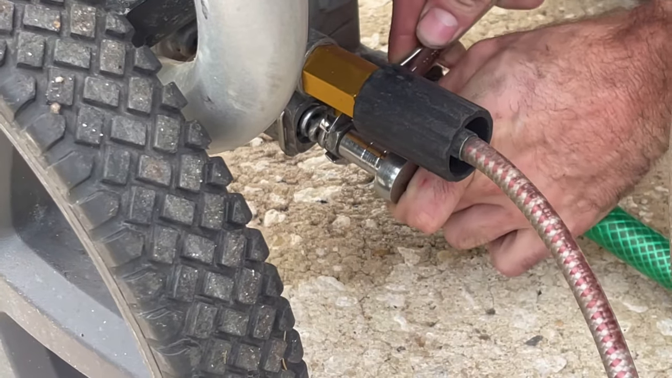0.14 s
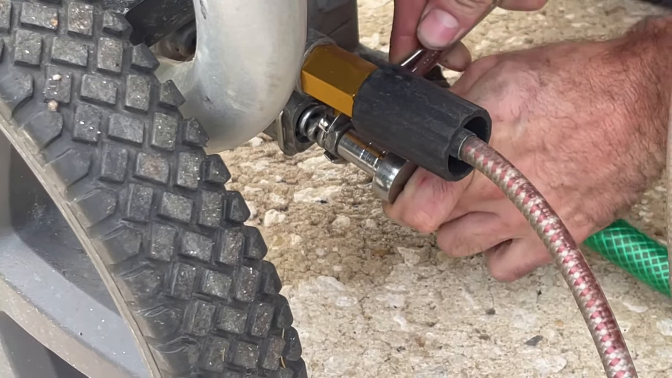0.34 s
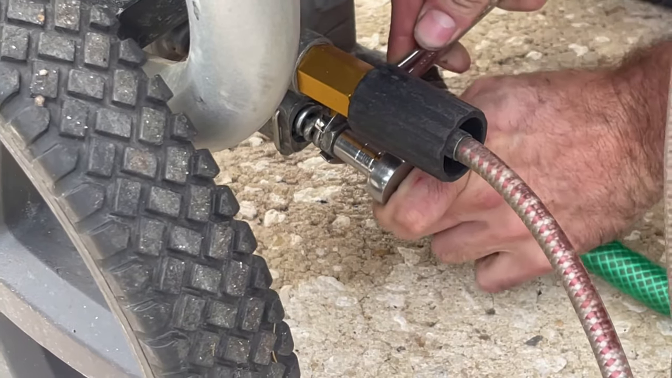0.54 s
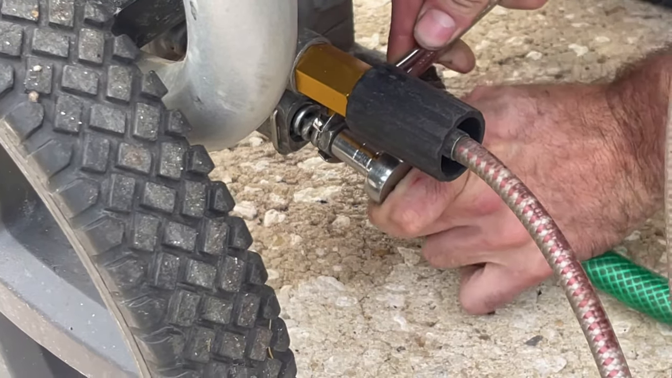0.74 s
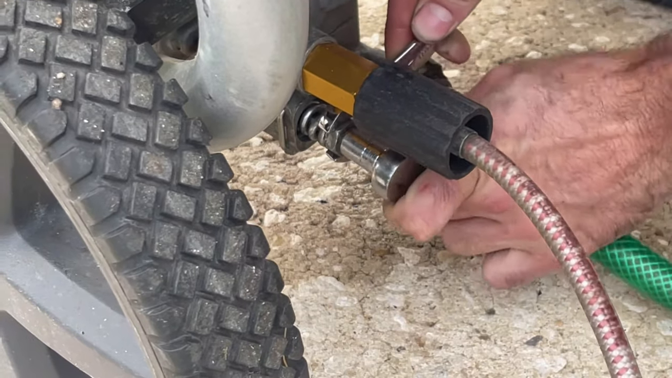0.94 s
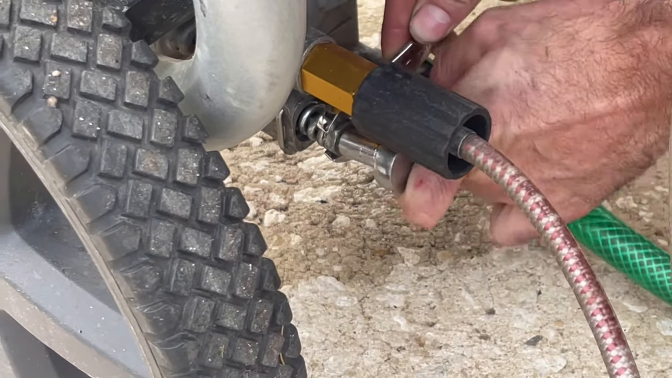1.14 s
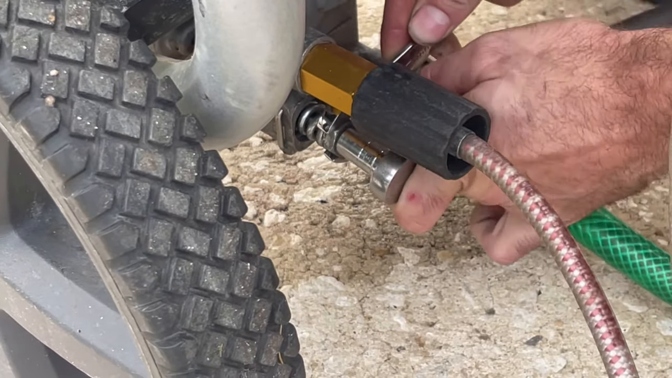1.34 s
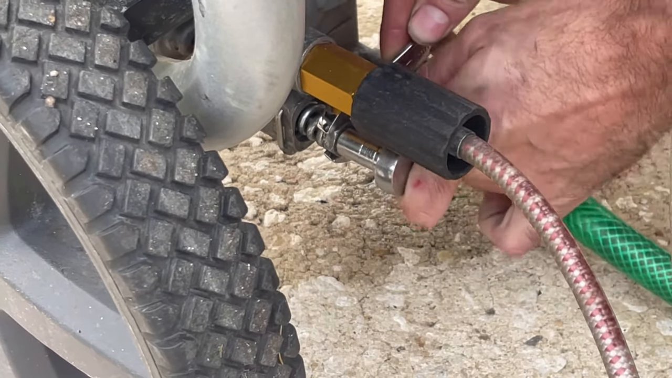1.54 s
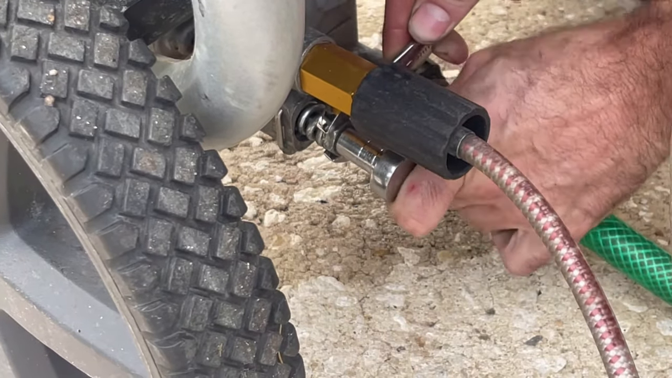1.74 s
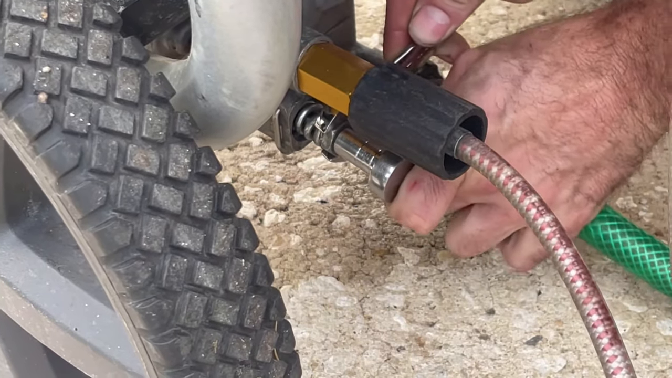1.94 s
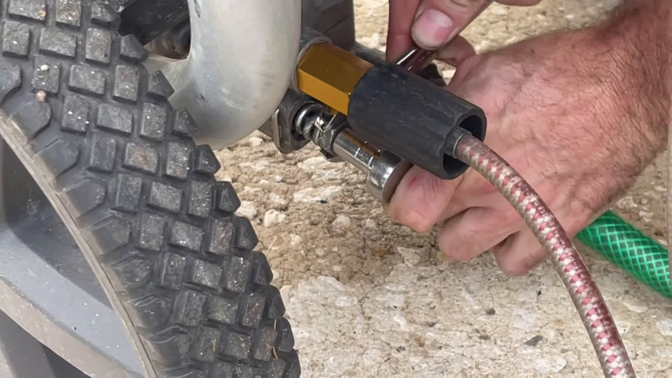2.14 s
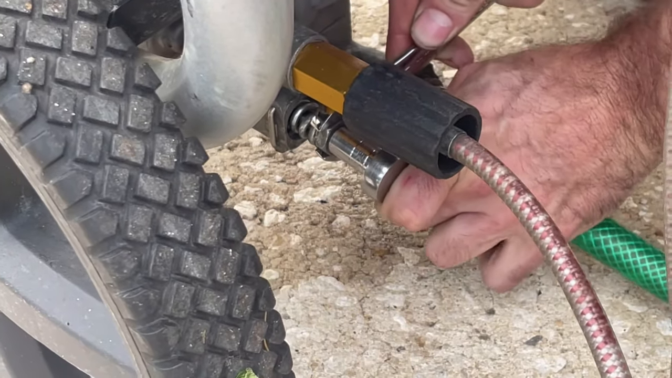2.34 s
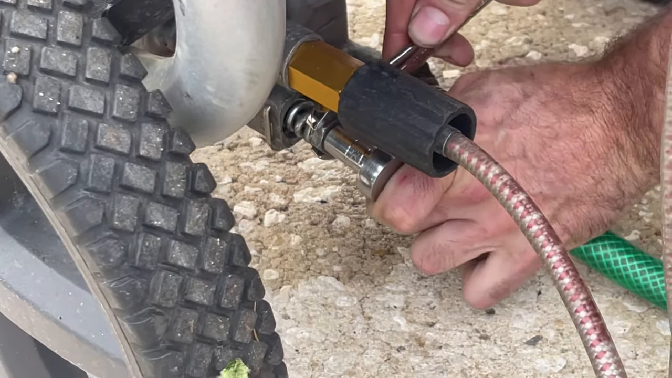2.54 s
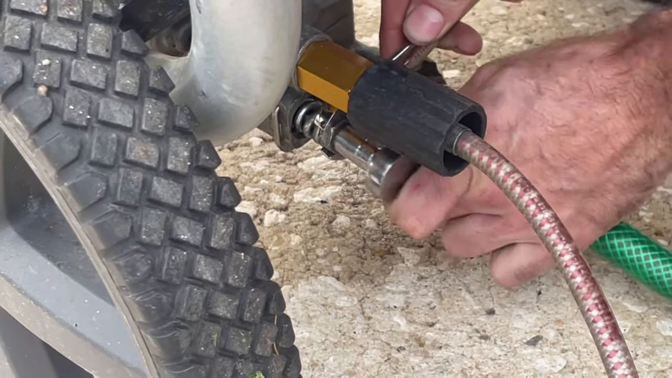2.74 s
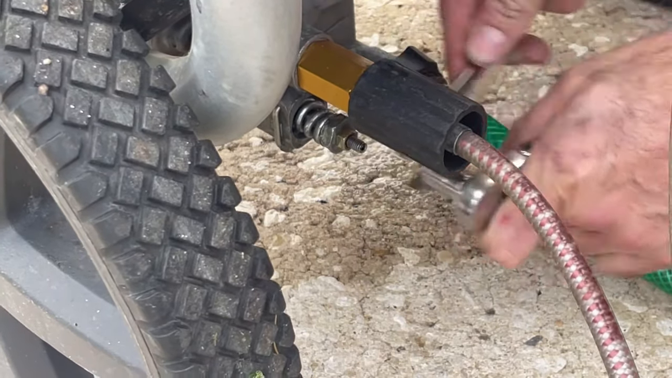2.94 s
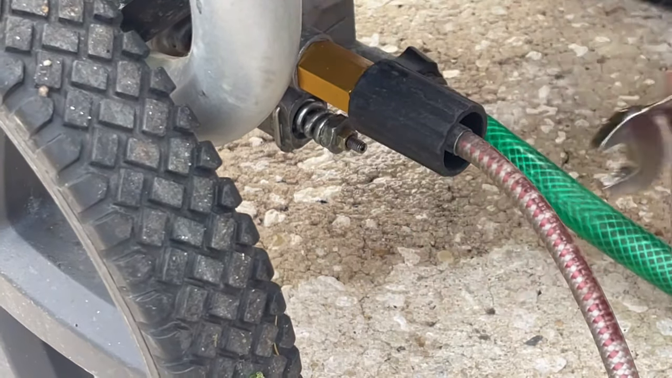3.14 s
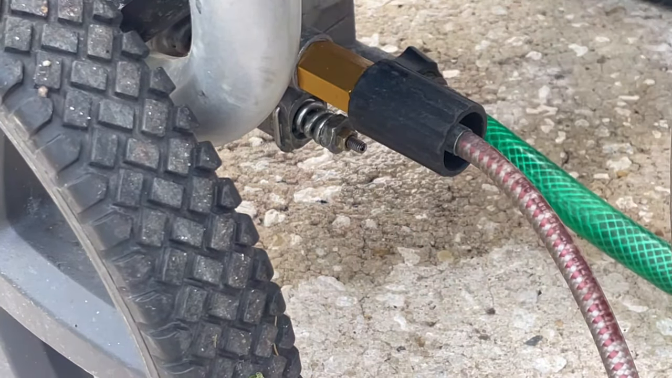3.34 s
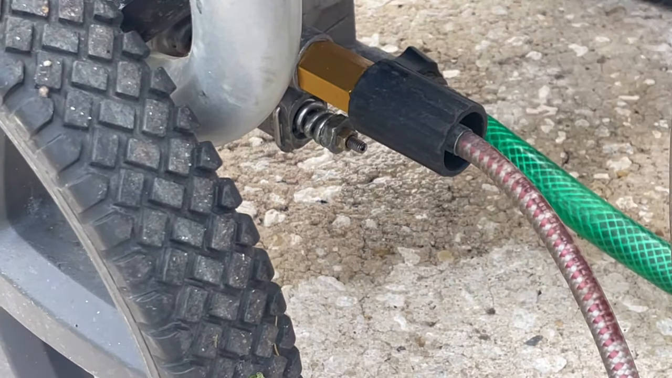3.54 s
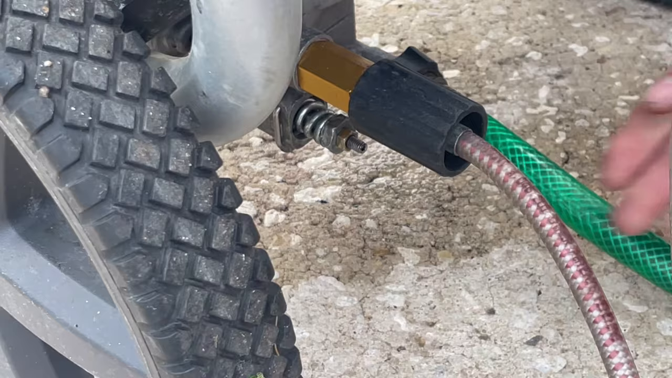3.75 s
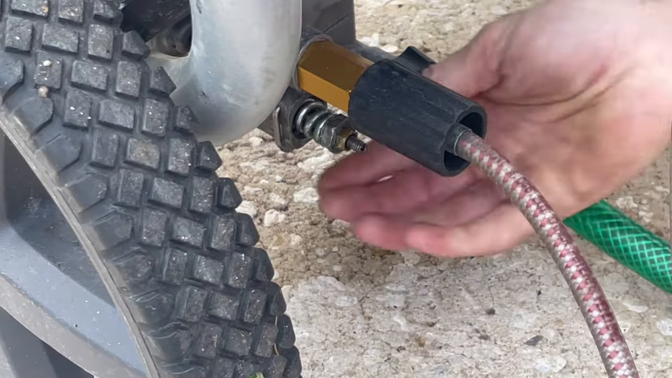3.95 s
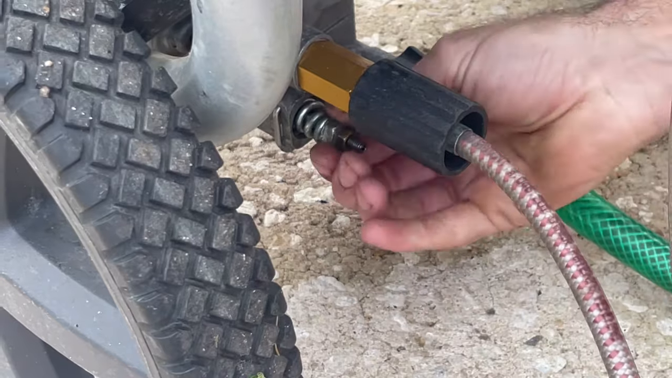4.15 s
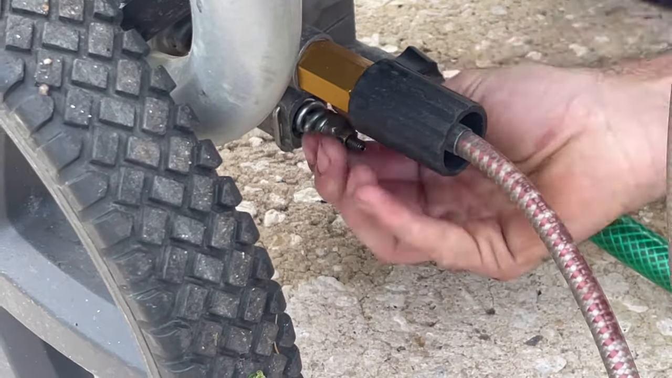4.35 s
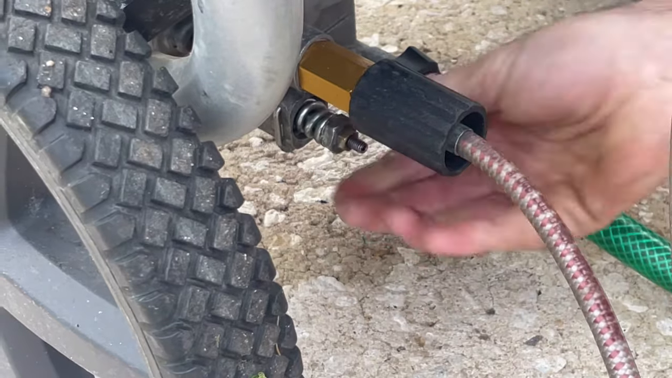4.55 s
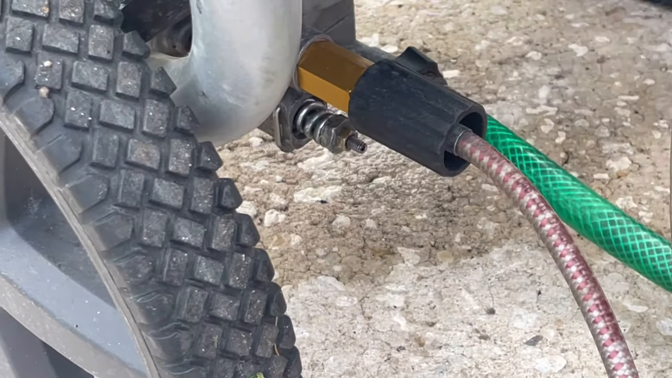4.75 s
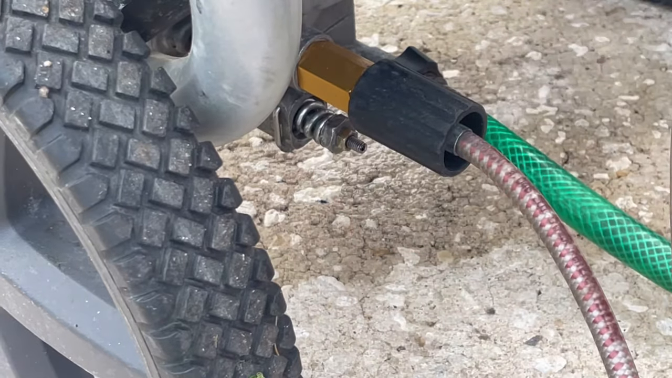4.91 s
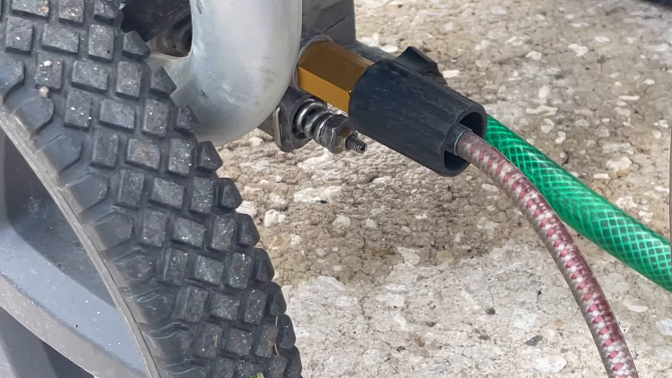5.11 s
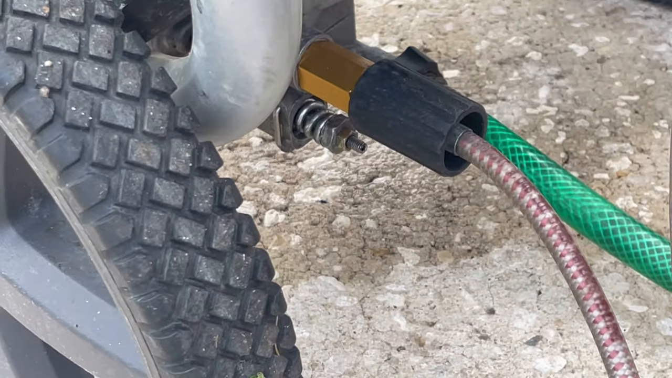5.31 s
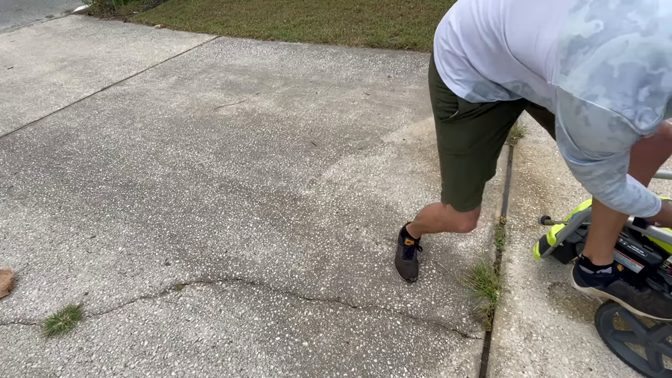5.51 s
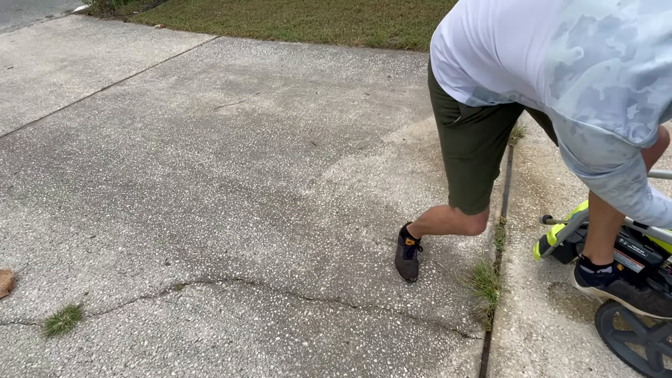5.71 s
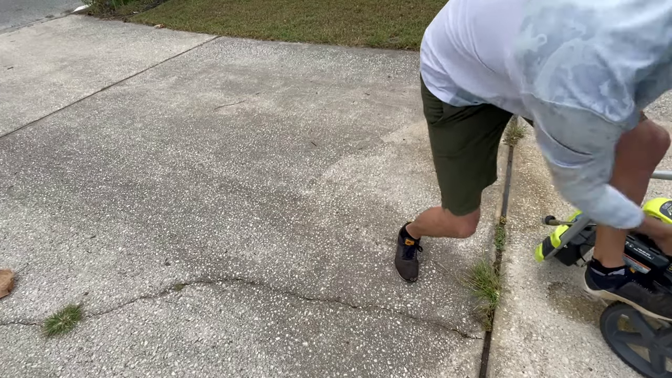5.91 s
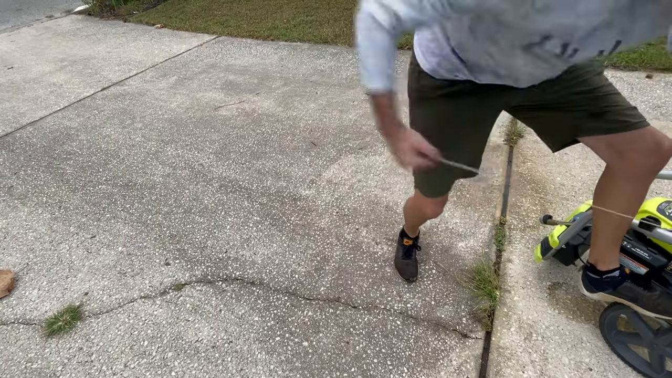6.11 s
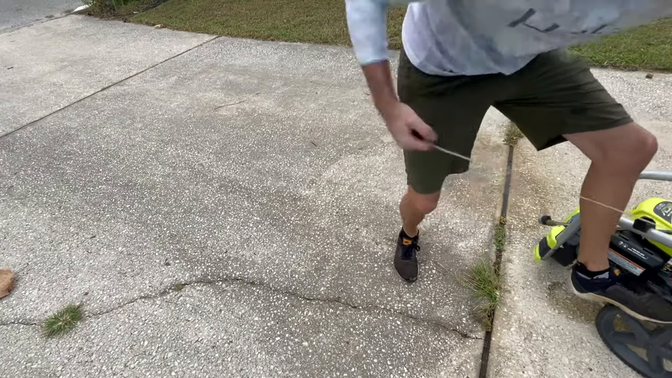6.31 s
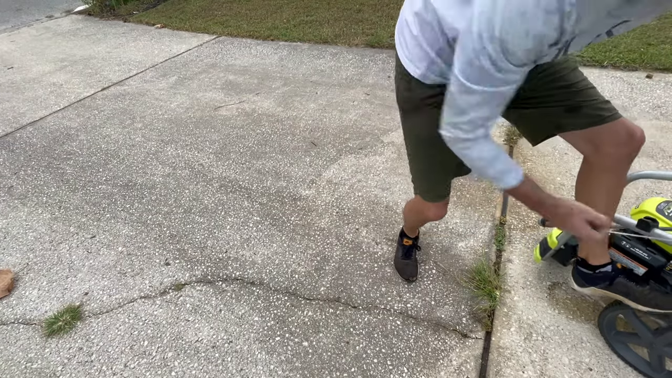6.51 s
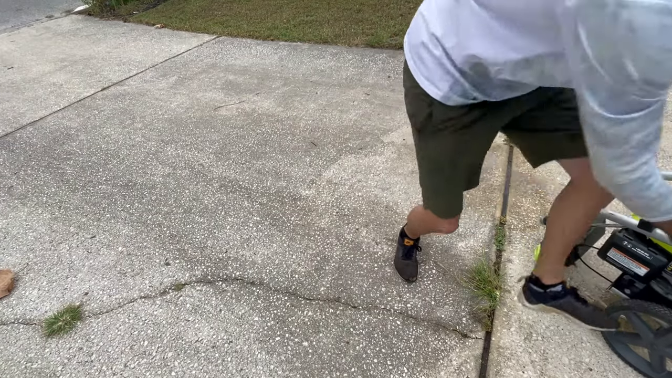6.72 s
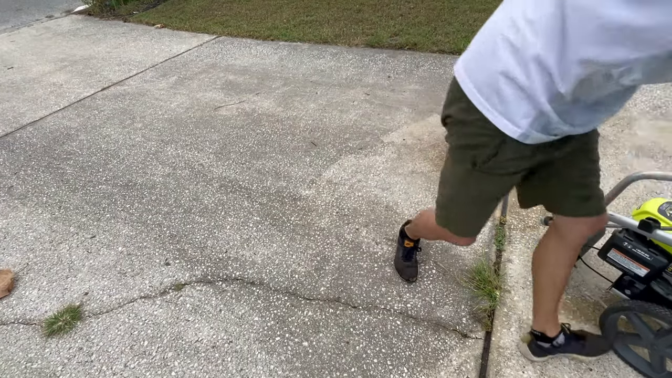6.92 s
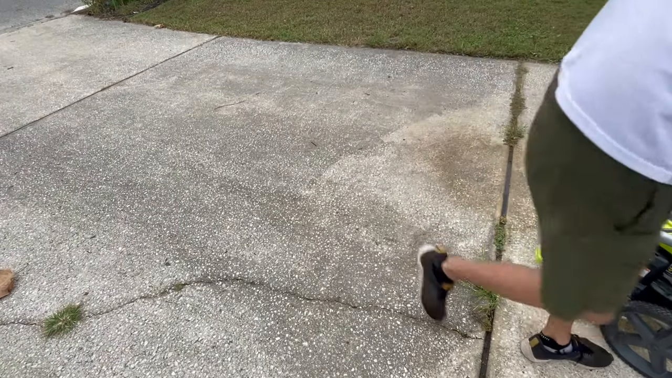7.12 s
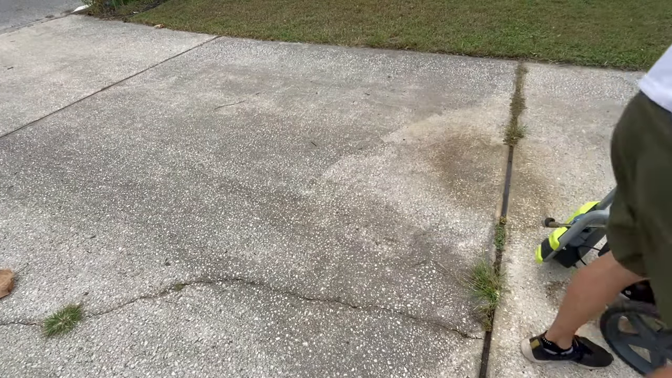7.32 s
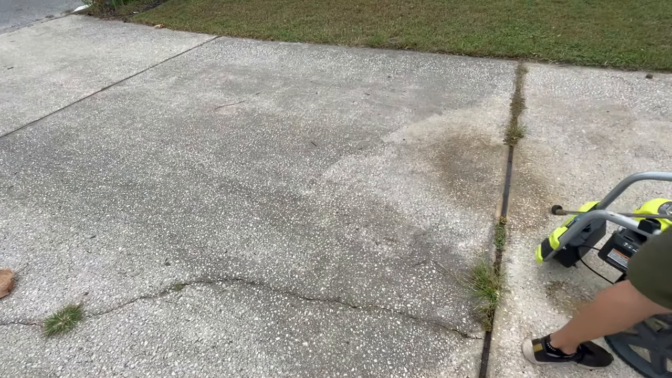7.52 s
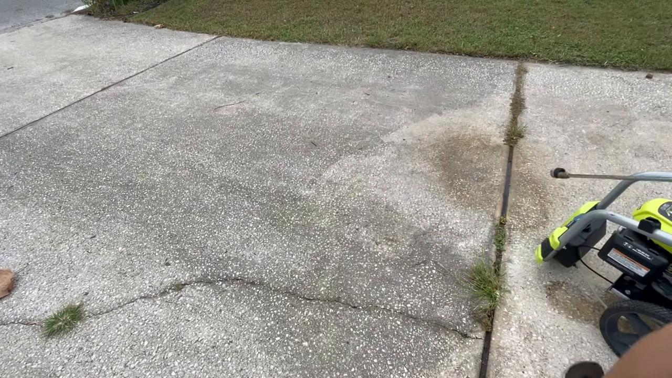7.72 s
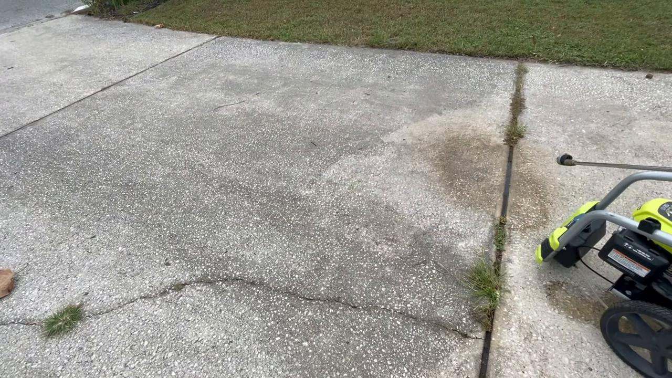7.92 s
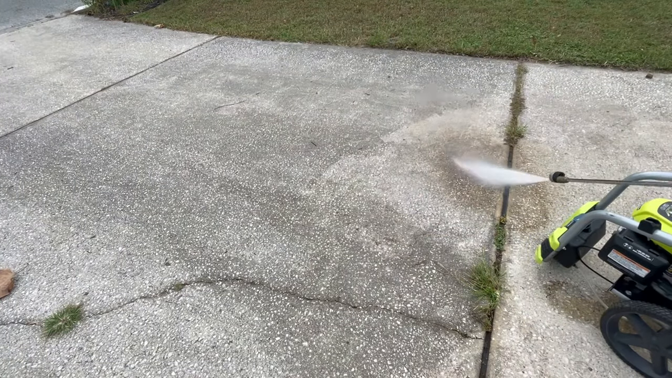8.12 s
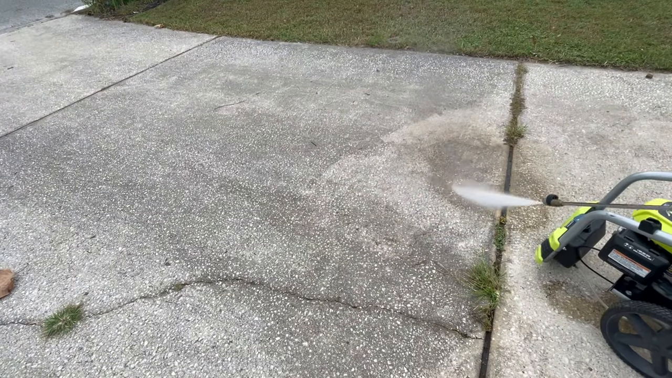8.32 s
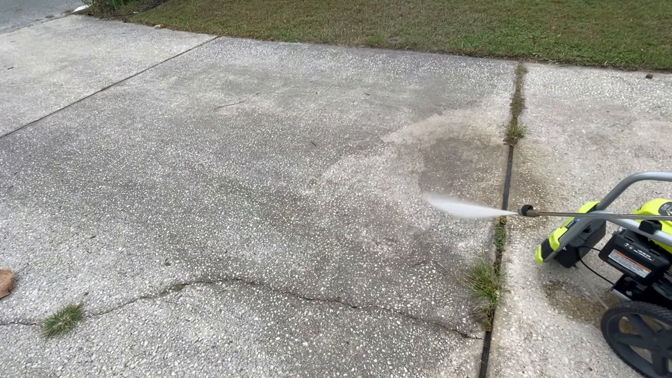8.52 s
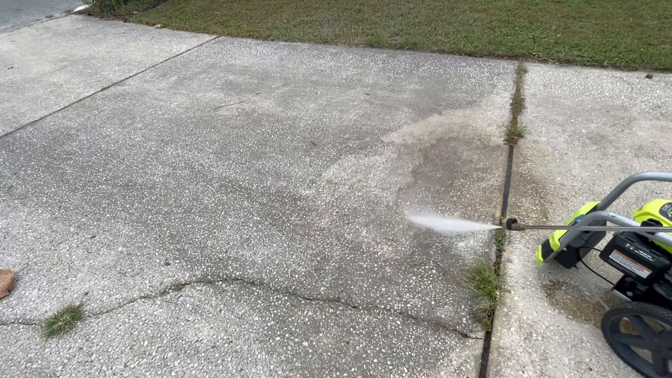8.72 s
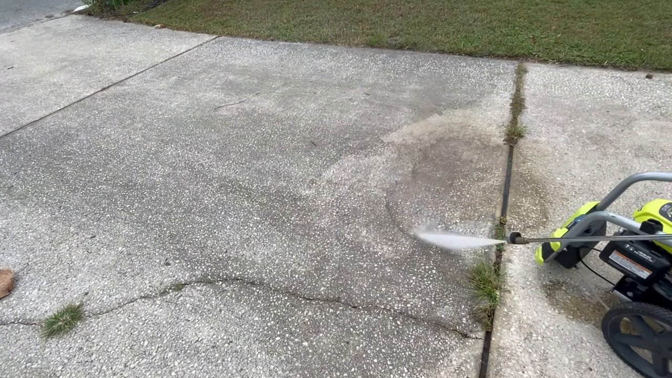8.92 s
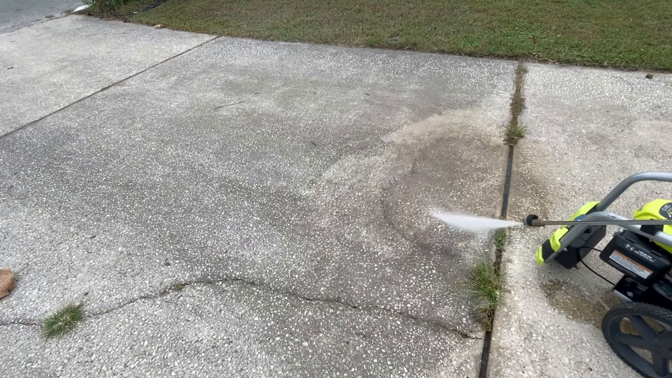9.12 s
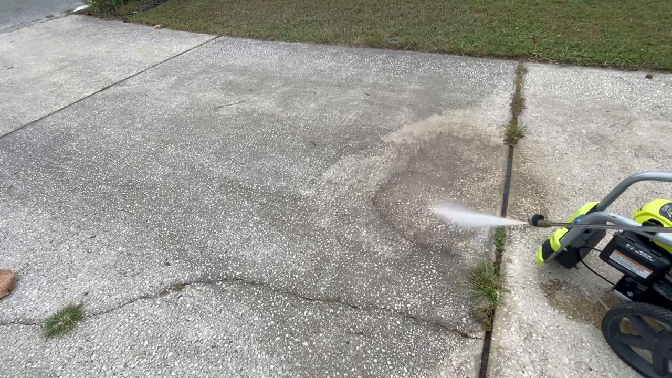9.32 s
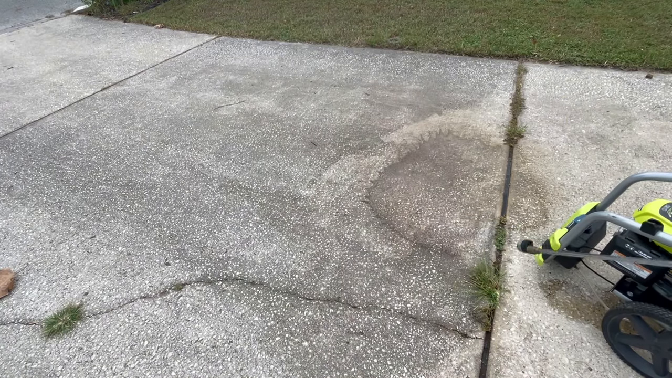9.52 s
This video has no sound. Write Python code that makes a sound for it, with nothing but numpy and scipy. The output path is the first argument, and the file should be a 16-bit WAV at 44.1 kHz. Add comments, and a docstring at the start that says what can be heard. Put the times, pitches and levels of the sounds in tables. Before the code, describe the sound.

Close up, a steel valve on a pressure washer is worked loose with sparse dry clicks, then bright clinks of its spring and nut, over a faint distant hum. The sound cuts to a wide outdoor driveway. A starter cord rasps, and the small petrol engine catches, runs loudly and sags towards idle. A trigger clicks, water hisses on concrete and the engine picks up again.

```python
"""At a pressure washer's pump, close up: a steel valve is worked loose with dry clicks, then bright
clinks of its spring and nut. Cut to the driveway, the machine spread wide in stereo: the starter
cord is pulled, the one-cylinder four-stroke catches and sags towards idle, then the trigger opens,
the jet hisses on the concrete and the engine picks up under load.
A far motor hums in the background."""
import sys
import numpy as np
from scipy import signal
from scipy.fft import rfft, irfft
from scipy.io import wavfile

SR = 44100
rng = np.random.default_rng(int(sys.argv[2]) if len(sys.argv) > 2 else 0)


def wav_out(sig):
    """Save sig, one row per channel (or a flat mono array), as 16-bit PCM at SR to the path in sys.argv[1]."""
    wavfile.write(sys.argv[1], SR, np.round(np.clip(np.atleast_2d(sig).T, -1, 1) * 32767).astype(np.int16))


N = 421596
TIME = np.arange(N) / SR
CUT_S, FIRST_STROKE_S = 5.36, 6.119

# Loose steel parts touch. Each row: start in seconds, level in dB, tilt in dB per octave, extra dB for
# the two modes near 4.5 kHz, seconds the fingers take to still a mode whose ring-time factor is 1.
STEEL_TOUCHES = [(3.319, -47.5, -2, -6, 0.059), (3.3399, -26.5, -6.5, -26, 0.22),
                 (3.382, -14, 16, -4, 0.15), (3.393, -21.5, 2.5, 12, 0.071), (3.492, -44.5, 12, -1, 0.048),
                 (3.6034, -24.5, 10, -24, 0.038), (3.625, -29.5, 7, -17, 0.063),
                 (3.7982, -30, 2.5, 12.5, 0.08), (3.9076, -43.5, -4.5, -7, 0.049),
                 (3.94, -48, -9.5, 1, 0.032), (4.395, -49, -3.5, -8, 0.087), (4.7582, -54, -3, 9, 0.18),
                 (4.814, -30, 5, 0.5, 0.07), (4.95, -41, 15, 13.5, 0.065), (5.077, -53.5, 2, -4, 1),
                 (5.1241, -29, -6.5, -0.5, 0.8), (5.2109, -13, 16.5, -8, 1)]
# Dry knocks of tool, fittings, shoes, starter and trigger. Each row: start in seconds, level in dB,
# brightness in dB (edge up, body down).
DRY_KNOCKS = [(0.109, -53.5, 0), (0.293, -65, -2), (0.56, -72, 5), (0.599, -76, 9), (0.658, -69, 3),
              (0.75, -63.5, 1), (0.899, -75, 11), (1.027, -36.5, -1), (1.093, -58, -18),
              (1.204, -62.5, 11.5), (1.227, -60.5, 7), (1.267, -59, 0), (1.561, -69, 3), (2.36, -72, 10),
              (2.675, -71.5, 11), (2.837, -41, 1), (2.884, -66.5, -22), (2.972, -56, -8), (2.988, -67, -1),
              (2.998, -48, 0), (3.339, -44, 4), (3.405, -40.5, 14.5), (3.56, -48.5, 11.5), (3.6, -36, 9.5),
              (4.217, -47.5, -0.5), (4.566, -43, 0.5), (4.677, -39.5, -1), (4.8147, -59, 8),
              (5.123, -42.5, -7.5), (5.153, -39.5, -5), (5.166, -36.5, 9.5), (5.236, -49, 12.5),
              (5.315, -49.5, 3.5), (5.398, -38.5, -3.5), (5.42, -41, -3), (5.468, -41.5, -19),
              (5.514, -34, -6.5), (5.591, -40.5, -3), (5.627, -48, -4), (5.808, -44, -1),
              (5.981, -18.5, -1.5), (6.01, -27, -5.5), (6.114, -41.5, 11.5), (6.2, -39, 7),
              (6.217, -27, 6.5), (6.222, -24.5, -3), (6.314, -25, -2.5), (8.109, -20, -1)]


def from_db(db):
    """Decibels to gain."""
    return 10 ** (np.asarray(db) / 20)


def unit_rms(x):
    """Scale to an rms of 1."""
    return x / np.sqrt(np.mean(x ** 2) + 1e-20)


def in_time(rows):
    """Each column of a curve over seconds, at every sample."""
    s, *columns = np.transpose(rows)
    return [np.interp(TIME, s, column) for column in columns]


def at_hz(points, hz):
    """Read a spectrum on a log-frequency axis."""
    point_hz, value = np.transpose(points)
    return np.interp(np.log(hz + 1e-3), np.log(point_hz), value)


def drift(rate_hz):
    """A smooth random wander of rms 1, mostly slower than rate_hz."""
    knots = rng.standard_normal(int(N / SR * 400) + 1)
    slow = irfft(rfft(knots) / (1 + (np.fft.rfftfreq(len(knots), 1 / 400) / rate_hz) ** 2))
    return np.interp(TIME, np.linspace(0, N / SR, len(slow)), unit_rms(slow))


def swell(s, width_s):
    """A smooth rise and fall of height 1 around time s."""
    return np.exp(-((TIME - s) / width_s) ** 2)


def burst(cycles, place, length):
    """A quick rise and slower fall of height 1 in each engine cycle; place and length are in cycles."""
    age = (cycles - place) % 1 / length
    return 2 * age * np.exp(1 - 2 * age) * (TIME > FIRST_STROKE_S)


def struck_mode(t, hz, db, t60):
    """A sine that dies away by 60 dB in t60 seconds."""
    return from_db(db - 60 * t / t60) * np.sin(2 * np.pi * hz * t)


def add(out, s, sound):
    """Mix a sound in at time s."""
    start = round(s * SR)
    out[..., start:start + sound.shape[-1]] += sound[..., :N - start]


def noise(spectrum):
    """Diffuse stereo noise of rms 1, coloured by (Hz, dB) points and falling away beyond their ends."""
    # How alike diffuse sound is at the two microphones. Each row: frequency in Hz, correlation.
    likeness = [(60, 1), (200, 0.94), (600, 0.41), (2400, 0.61), (5000, 1), (9000, 0.041), (15000, 0.18)]
    hz = np.fft.rfftfreq(N, 1 / SR)
    mid, side = rfft(rng.standard_normal((2, N)))
    alike = at_hz(likeness, hz)
    ends = np.minimum(1, hz / spectrum[0][0]) ** 3 / np.maximum(1, hz / spectrum[-1][0]) ** 3
    pair = np.sqrt(1 + alike) * mid + np.sqrt(1 - alike) * side * [[1], [-1]]
    return unit_rms(irfft(pair * ends * from_db(at_hz(spectrum, hz)), N))


def stereo_widening(x):
    """The recorder's stereo widening gives left and right different levels and phases at each frequency."""
    # Each row: frequency in Hz, left over right in dB.
    balance = [(60, -1), (110, 0.5), (200, 0.5), (380, -2.5), (700, -6.5), (1290, -4), (2380, 1), (4400, 6),
               (8120, 6), (15000, -6)]
    # Each row: frequency in Hz, lead of the left channel in radians.
    lead = [(30, -1.5), (86, 0.5), (258, -0.05), (645, -1.87), (1400, -2), (2600, -4), (3450, -4.5),
            (5200, -4.5), (6500, -4.5), (11000, -20), (15000, -19.5)]
    hz = np.fft.rfftfreq(N, 1 / SR)
    half = from_db(at_hz(balance, hz) / 2) * np.exp(.5j * at_hz(lead, hz))
    return irfft(rfft(x) * np.array([half, 1 / half]), N)


def engine():
    """Firings drive the exhaust tone, gusts of gas noise and the clatter of piston and valves."""
    # Each row: time in seconds, firings per second.
    firing_rate = [(6.119, 6.59), (6.25, 10.85), (6.57, 26.89), (7.01, 26.21), (7.35, 24.32), (7.7, 23.31),
                   (7.97, 21.75), (8.18, 21.64), (8.58, 29.82), (9.0, 31.21), (9.56, 30.27)]
    # How hard the engine works. Each row: time in seconds, effort in dB (taken about its mean).
    effort = [(6.44, -22), (6.66, -19), (7.13, -22.5), (7.22, -26.5), (8.19, -26.5), (8.86, -20),
              (9.51, -25.5), (9.56, -29)]
    # The pump's load on the engine. Each row: time in seconds, share from 0 to 1.
    pump_load = [(6.4, 0.36), (7.0, 0.44), (7.3, 0.15), (8.15, 0.24), (8.6, 0.74), (9.5, 0.83)]
    # Colours of exhaust gas, clatter and valve-gear ticks. Each row: frequency in Hz, relative dB.
    gas_colour = [(100, -13), (200, -8), (340, -16.5), (480, -8), (650, -2.5), (900, -40), (1400, -23)]
    clatter_colour = [(520, -3.5), (800, -4.5), (906, -7), (1280, -3.5), (1490, -8), (1610, -4.5),
                      (2430, -10.5), (3950, -16), (4700, -15), (9090, -24.5), (10200, -21), (11700, -28.5),
                      (15700, -41)]
    tappet_colour = [(3300, -11), (4200, -1.5), (4650, -2), (5200, -4), (7000, -10.5), (8800, -13),
                     (10500, -5.5), (12500, -8.5), (15000, -25)]
    speed, load = in_time(firing_rate)[0], in_time(pump_load)[0]
    effort_db = in_time(effort)[0] - np.mean(np.array(effort)[:, 1])
    cycles = np.cumsum(speed * (TIME > FIRST_STROKE_S)) / SR
    turning = np.interp(TIME, [6.1, 6.44], [0, 1]) ** 2
    caught = np.interp(TIME, [6.36, 6.6], [0, 1])
    surge = swell(6.41, 0.3)   # the engine catches with a surge that dies away

    boom, drone = exhaust(cycles, load)
    boom_db = -19 + 0.38 * effort_db + 6.5 * surge
    # under load the exhaust gathers into one hard bark per cycle
    bark_db = load * (13 * burst(cycles, place=-.08, length=.17) - 9)
    drone_gain = from_db(-20 + 1.1 * effort_db + bark_db)
    tone = from_db(boom_db) * boom + drone_gain * drone + crankcase(cycles, speed, load)

    gusts, rattle = stroke_bursts(cycles)
    puffs = .45 + gusts   # some gas leaks on between the bursts
    puffs /= np.sqrt(np.mean(puffs[caught > .5] ** 2))
    gas = drone_gain * from_db(5.5 - 11.5 * caught) * puffs * noise(gas_colour)

    rattle *= from_db(8 * swell(6.36, 0.12))   # the valve gear hits harder in the first slow strokes
    metal = (1 + .5 * rattle) * noise(clatter_colour) + from_db(-1) * rattle * noise(tappet_colour)
    clatter = from_db(-25 + 0.49 * effort_db + 4.5 * surge + drift(170)) * metal
    running_tone = caught * from_db(0.1 * drift(36)) * tone
    return running_tone + first_strokes(cycles, speed) + turning * (gas + clatter + rocker(cycles, load))


def exhaust(cycles, load):
    """The muffler's low boom and higher drone change colour as the pump loads the engine."""
    # Engine orders, running free and pumping. Each row: multiple of the firing rate, relative dB.
    free_orders = [(1, -37), (2, -4.5), (3, 1.5), (4, -1), (5, -5.5), (6, 1.5), (7, -3), (8, -4.5),
                   (9, -12.5), (10, -3), (11, -8.5), (12, -22.5), (13, -11), (14, -11), (15, -25.5),
                   (16, -24), (17, -22), (18, -1.5), (19, -3), (20, -9.5), (21, -2), (22, -6), (23, 1),
                   (24, -14.5), (25, -9.5), (26, -1.5), (27, -7.5), (28, -2), (29, -22), (30, -2),
                   (31, -13), (32, -15.5)]
    pumping_orders = [(1, -32.5), (2, 2.5), (3, -3.5), (4, -1.5), (5, -6), (6, -0.5), (7, -7.5), (8, -18.5),
                      (9, -8.5), (10, -20), (11, -16), (12, -10), (13, -22), (14, -17), (15, -15), (16, 5),
                      (17, -6), (18, 11.5), (19, 11), (20, 0), (21, -11), (22, -16), (23, -4), (24, -19),
                      (25, -33), (26, -31), (27, -37), (28, -6.5), (29, -37), (30, -38), (31, -45),
                      (32, -14.5)]
    rough_cycles = cycles + .0005 * drift(25)
    free, pumping = exhaust_puffs(free_orders, rough_cycles), exhaust_puffs(pumping_orders, rough_cycles)
    return (1 - load) * free + load * pumping


def exhaust_puffs(orders, cycles, lead_cycles=0.0746, lag_cycles=0.317, lagging_orders=6.65, size=2048):
    """One puff per cycle, bark in front and boom behind; returns boom and drone, rms 1 each."""
    multiple, db = np.transpose(orders)
    order = np.arange(size // 2 + 1)
    level = from_db(np.interp(order, multiple, db)) / np.maximum(1, order / multiple[-1]) ** 6
    # minimum phase packs the energy at the front of the puff
    cepstrum = irfft(np.log(np.maximum(level, from_db(-60))))
    fold = np.r_[1, np.full(size // 2 - 1, 2), 1, np.zeros(size // 2 - 1)]
    puff = np.exp(rfft(cepstrum * fold))
    # the muffler delays long waves
    puff *= np.exp(2j * np.pi * lag_cycles * lagging_orders * np.exp(-order / lagging_orders))
    shapes = [unit_rms(irfft(puff * band)) for band in ((order > 0) & (order < 14), order >= 14)]
    place = (cycles + lead_cycles) % 1
    return np.array([np.interp(place, np.arange(size) / size, shape) for shape in shapes])


def stroke_bursts(cycles):
    """Envelopes of gas noise and of clatter through the four strokes, each burst slightly uneven."""
    # Each row: place and length in cycles, gas strength, clatter strength.
    bursts = [(-.07, 0.07, 1, 0.073), (-.07, 0.13, 0.37, 0.95), (.22, 0.038, 0.44, 0.16),
              (0.4, 0.14, 0.17, 0.22)]
    gusts, rattle = 0, 0
    for place, length, gas, clatter in bursts:
        shape = burst(cycles, place, length) * from_db(0.23 * drift(12))
        gusts += gas * shape
        rattle += clatter * shape
    return gusts, rattle


def first_strokes(cycles, speed, best_rate_hz=13.5, rate_width_hz=3, rise_s=0.0068):
    """Each slow stroke shoves a soft slug of air into the pipe, hardest at one firing rate."""
    # Air column of intake and muffler. Each row: pitch in Hz, level in dB, t60 in seconds.
    pipe_modes = [(65.5, 2, 0.048), (103, 10.5, 0.042), (146, -6, 0.06), (230, -6, 0.027)]
    out, t = np.zeros(N), TIME[:SR // 4]
    thump = sum(struck_mode(t, *mode) for mode in pipe_modes) * (1 - np.exp(-(t / rise_s) ** 2))
    for start in np.searchsorted(cycles, np.arange(7), side="right"):
        level_db = 1.5 - ((speed[start] - best_rate_hz) / rate_width_hz) ** 2
        add(out, TIME[start] + 0.0015, from_db(level_db) * thump)
    return out


def crankcase(cycles, speed, load):
    """Every firing strikes the same crankcase modes, harder under load."""
    # Each row: pitch in Hz, unloaded level in dB, t60 in seconds.
    case_modes = [(621, -34, .05), (1135, -37, 0.037), (1270, -33.5, 0.086), (1450, -33.5, 0.096),
                  (1640, -40, .04)]
    age_s = (cycles + .05) % 1 / speed
    ring = sum(struck_mode(age_s, *mode) for mode in case_modes)
    return from_db(4 * load - 0.5 * drift(23)) * ring


def rocker(cycles, load, ring_hz=4680):
    """The rocker snaps shut once a cycle with a crisp metallic tick, harder under load."""
    ring = np.sin(2 * np.pi * ring_hz * TIME + 0.56 * drift(200))
    return from_db(-24.5 + 3.5 * load) * burst(cycles, place=-.045, length=.06) * ring


def jet(trigger_s=8.11, nearest_s=8.88):
    """The fan of water hisses as the trigger opens and swells as it sweeps nearer the microphones."""
    # Spray on concrete. Each row: frequency in Hz, relative dB.
    spray_colour = [(700, -23), (1300, 11), (2500, 5.5), (4700, -0.5), (7000, -6.5), (9000, -6.5),
                    (11000, 1.5), (13000, -7), (15500, -34)]
    level_db = -27.5 + 5 * swell(nearest_s, 0.28) + 0.7 * drift(30)
    return from_db(level_db) * noise(spray_colour) * (TIME > trigger_s)


def cord(pull_s=5.99, run_out_s=6.32):
    """The starter cord rasps and squeaks through its guide, pulled ever faster until it runs out."""
    # The squeak on the guide. Each row: time in seconds, pitch in Hz, level in dB.
    squeak_curve = [(6.07, 2700, -60), (6.09, 3050, -49), (6.115, 4270, -48), (6.14, 4470, -46),
                    (6.158, 4680, -27), (6.18, 4850, -45), (6.235, 4180, -23), (6.265, 4090, -31),
                    (6.29, 4060, -70)]
    squeak_hz, squeak_db = in_time(squeak_curve)
    squeak_gain = from_db(squeak_db - 2 + 4 * drift(90))
    squeak = squeak_gain * np.sin(2 * np.pi * np.cumsum(squeak_hz) / SR + 0.97 * drift(120))
    late_s = TIME - run_out_s
    whir_db = -27 + np.minimum(40 * late_s, -400 * late_s) + 2 * drift(80)
    whir = noise([(150, 6), (700, 6.5), (1500, 1), (3000, -1), (4700, 0.5), (8800, -10),
                  (11000, -7), (15000, -26)])
    return (from_db(whir_db) * whir + squeak) * (TIME > pull_s)


def recoil():
    """Spool and pawls give a loose, grainy scrape as the cord winds back in."""
    scrape = noise([(1200, 6), (2500, 2), (4000, -2), (6000, -7), (9000, -17), (11000, -10), (15000, -24)])
    return swell(6.58, 0.21) * from_db(-29 + 4.5 * drift(110)) * scrape


def clinks(let_go_s=5.0, tumble_s=5.255, pivot_hz=6860, scatter_db=4.5, rise_s=0.00059):
    """Each touch rings the spring and nut, and closing fingers damp them ever faster."""
    # Pitches of the steel's modes in Hz.
    steel_hz = [1240, 1640, 2560, 3583, 4447, 4520, 6820, 6901, 7040, 8583, 9905, 11192, 12382, 13388,
                15464]
    # The same modes. Each row: level in dB while seated, level in dB when free, ring-time factor.
    steel_modes = [(-27.5, -33, 1.03), (-27.5, -30, 0.63), (-13.5, -8, 1.27), (-14.5, 0, 0.79),
                   (-0.5, 4, 0.75), (-13.5, -24.5, 0.76), (-8, -1, 0.91), (2, -5.5, 0.46), (-5, -5, 1.06),
                   (-36.5, -35, 3), (-13, -8, 1.02), (-17.5, -32, 0.8), (-29.5, -24, 1.6),
                   (-25.5, -33, .65), (-40.5, -52, 1)]
    out, t = np.zeros((2, N)), TIME[:SR // 2]
    hz = np.array(steel_hz)
    seated_db, free_db, ring_factor = np.transpose(steel_modes)
    pair, lower = (hz > 4000) & (hz < 5000), (hz > 2000) & (hz < 5000)
    age = t / ring_factor[:, None]
    attack = 1 - np.exp(-(t / rise_s) ** 2)
    for s, level_db, tilt_db, pair_db, stilled_s in STEEL_TOUCHES:
        chance = rng.standard_normal((3, len(hz)))
        mode_db = (seated_db if s < let_go_s else free_db) + scatter_db * chance[0]
        start_db = level_db + mode_db + tilt_db * np.log2(hz / pivot_hz) + pair_db * pair
        decay_db = -60 * np.minimum(age / 0.86 + (age / stilled_s) ** 2, 3)
        # the freed spring tumbles and for a moment turns its lower modes away
        tumble_db = -16 * lower[:, None] * np.exp(-((s + t - tumble_s) / 0.035) ** 2)
        envelope = attack * from_db(start_db[:, None] + decay_db + tumble_db)
        for mic in range(2):
            phase = 0.79 * hz / hz.mean() * chance[1 + mic]   # short waves reach the pair out of step
            modes = envelope * np.sin(2 * np.pi * hz[:, None] * t + phase[:, None])
            add(out[mic], s, modes.sum(axis=0))
    return chatter(out)


def chatter(ring):
    """The loose nut buzzes against its seat and shakes the ring in strength and in pitch."""
    shaken = signal.hilbert(ring) * np.exp(0.46j * drift(45))
    return shaken.real * from_db(2 * drift(70) - 1)


def pings(rise_s=0.0005):
    """The nut pings briefly where it is caught."""
    # Each row: start in seconds, pitch in Hz, level in dB, t60 in seconds.
    nut_pings = [(3.3385, 5480, -17, .025), (3.3385, 6040, -15, .02), (3.382, 2570, -29.5, .12),
                 (3.5595, 2590, -30.5, .03), (3.601, 2540, -25.5, .035), (3.623, 2615, -28.5, .07),
                 (5.2125, 4450, -10.5, .045)]
    out, t = np.zeros(N), TIME[:SR // 4]
    for s, hz, db, t60 in nut_pings:
        add(out, s, struck_mode(t, hz, db, t60) * (1 - np.exp(-t / rise_s)))
    return out


def knocks(halving_db=15.5, rise_s=0.0011):
    """A contact cracks in three registers; the body lasts longest and nearby walls add a short tail."""
    # Tails of body, middle and edge. Each row: relative level in dB, t60 in seconds.
    wall_tails = [(-22, 0.33), (-25, 0.22), (-25, 0.13)]
    out, t = np.zeros((2, N)), TIME[:SR // 3]
    body = noise([(280, -4.5), (550, -2), (900, -4.5), (1300, -6.5)])
    middle = noise([(900, -17.5), (1250, 4), (1700, 2), (2400, 5), (3300, 0), (4600, -21.5)])
    edge = from_db(5.5) * noise([(3500, 4), (4800, 4), (7200, 3), (8600, -5), (10500, 3.5),
                                 (13000, -11), (15500, -26.5)])
    tails = [from_db(db - 60 * t / t60) for db, t60 in wall_tails]
    attack = 1 - np.exp(-t / rise_s)
    # each touch of the steel also cracks brightly, just ahead of its ring
    cracks = [(s - 0.0026, db - 19.5, 10.5) for s, db, *_ in STEEL_TOUCHES]
    for s, level_db, bright_db in DRY_KNOCKS + cracks:
        start = round(s * SR)
        t60 = 0.058 * .5 ** (max(bright_db, 0) / halving_db)   # the brighter, the shorter
        registers = [(body, -bright_db, 1.37 * t60), (middle, 0, t60), (edge, bright_db, t60)]
        for (band, lean_db, ring_s), tail in zip(registers, tails):
            envelope = attack * (from_db(-60 * t / ring_s) + tail)
            add(out, s, from_db(level_db + lean_db) * envelope * band[:, start:start + len(t)])
    return out


def pump_body(hand_on_s=3.2, hand_t60_s=.15, scatter_db=5):
    """Knocks ring the hollow body, bright ones less; once a hand grips the pump, its ring dies quickly."""
    # Modes of body and frame. Each row: pitch in Hz, relative level in dB, undamped t60 in seconds.
    body_modes = [(504, -12.5, 0.2), (615, -17.5, 1), (884, -17.5, .25), (1135, -14, 0.22),
                  (1200, -13.5, 0.37), (1425, -7, 0.042), (1993, -3, 0.091), (2190, -8, 0.16),
                  (2690, -6.5, 0.053), (3050, -8.5, 0.089), (4220, -14, 0.11), (4540, -12.5, .05)]
    out, t = np.zeros(N), TIME[:SR]
    modes = np.array([struck_mode(t, *mode) for mode in body_modes])
    for s, level_db, bright_db in DRY_KNOCKS:
        strength = from_db(level_db - 0.21 * bright_db + scatter_db * rng.standard_normal(len(modes)))
        strength *= rng.choice([-1, 1], len(modes))
        if s < CUT_S:
            damping = from_db(-60 * t / hand_t60_s) if s > hand_on_s else 1
            add(out, s, strength @ modes * damping)
    return out


def thread(width_hz=125):
    """Thread and spring rasp softly, metal on metal, rising in pitch as each turn gathers speed."""
    # Each row: start and length in seconds, level in dB, pitch in Hz, rise in Hz.
    turns = [(1.035, .43, -60, 1197, 131), (1.52, .18, -65, 1190, 50), (1.904, .32, -65.5, 1180, 131),
             (2.0, 0.56, -80, 5140, 49.5), (4.133, 0.33, -71, 4800, 50)]
    out, rasp = 0, drift(width_hz) + 1j * drift(width_hz)
    for s, length, db, hz, rise_hz in turns:
        pace = np.abs(np.sin(np.pi * np.clip((TIME - s) / length, 0, 1)))
        carrier = np.exp(2j * np.pi * np.cumsum(hz + rise_hz * pace) / SR)
        out += from_db(db) * np.sqrt(pace) * np.real(rasp * carrier)
    return out


def fingers():
    """Skin drags over the fitting in fine grains."""
    # Each row: centre and half-width in seconds, level in dB.
    rubs = [(2.888, 0.12, -70), (3.45, 0.29, -58), (4.82, 0.26, -61), (5.342, 0.14, -52.5)]
    pressure = sum(from_db(db) * swell(s, width_s) for s, width_s, db in rubs)
    grain = from_db(4 * drift(60))
    return pressure * grain * noise([(500, 2.5), (1400, -3), (2400, -0.5), (4000, -3.5), (7000, -4),
                                     (8500, -21), (12000, -12.5), (15000, -30)])


def shoe_scuff():
    """A shoe scuffs on gritty concrete."""
    envelope = swell(5.45, 0.096) * from_db(-45 + 2 * drift(80))
    return envelope * noise([(2000, 6), (4500, -1), (8000, -8), (11000, 1), (15000, -17)])


def far_motor(lines):
    """A distant motor hums in steady lines that wander a little in phase."""
    return sum(np.sqrt(2) * from_db(db) * np.sin(2 * np.pi * hz * TIME + 0.4 * drift(6)) for hz, db in lines)


def pump_ambience():
    """Low, quiet air beside the pump; the far motor fades in."""
    # Each row: frequency in Hz, relative dB.
    air_colour = [(15, -65), (25, -18.5), (75, 0.5), (98, -3), (202, -14.5), (301, -30.5), (344, -30),
                  (1000, -42), (1310, -39.5), (1670, -43), (5010, -49.5), (8320, -60.5), (10000, -55.5),
                  (15000, -74)]
    # Each row: pitch in Hz, rms level in dB.
    hum_lines = [(86.1, -42.5)]
    air = from_db(-44.5 + drift(8)) * noise(air_colour)
    return air + far_motor(hum_lines) * np.interp(TIME, [2.9, 3.7], [0, 1])


def driveway_ambience():
    """Open air rumbles over the driveway, with the far motor in it."""
    # Each row: frequency in Hz, relative dB.
    air_colour = [(25, -27), (75, 10), (115, -5), (200, -3), (350, -14), (700, -9.5), (1500, -16),
                  (2400, -27), (4000, -37.5), (8500, -45), (15000, -54)]
    # Each row: pitch in Hz, rms level in dB.
    hum_lines = [(75.4, -43), (156.1, -40.5), (231.5, -45), (312.2, -56), (640.6, -53.5), (678.3, -54),
                 (855.9, -57.5)]
    return from_db(-39) * noise(air_colour) + far_motor(hum_lines)


def scene():
    """Close work at the pump, then a hard cut to the machine on the driveway."""
    near_air, open_air, scuff = pump_ambience(), driveway_ambience(), shoe_scuff()
    at_pump = near_air + fingers() + thread() + clinks() + pings() + pump_body()
    on_driveway = open_air + stereo_widening(scuff + cord() + recoil() + engine() + jet())
    cut = np.clip((TIME - CUT_S) / .002 + .5, 0, 1)
    return (1 - cut) * at_pump + cut * on_driveway + knocks()


def record(dry, low_cut_hz=40, ceiling=.92, stopband_hz=16536):
    """Behind the microphones: a low cut for rumble, a soft limit on peaks and a steep cut at the top."""
    thinned = signal.sosfilt(signal.butter(2, low_cut_hz, "high", fs=SR, output="sos"), dry)
    rounded = thinned / (1 + (np.abs(thinned) / ceiling) ** 6) ** (1 / 6)
    return signal.sosfilt(signal.cheby2(16, 70, stopband_hz, fs=SR, output="sos"), rounded)


dry = scene()
out = record(dry)
wav_out(out)
```